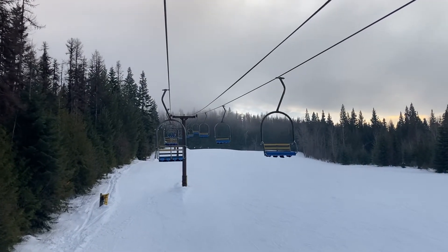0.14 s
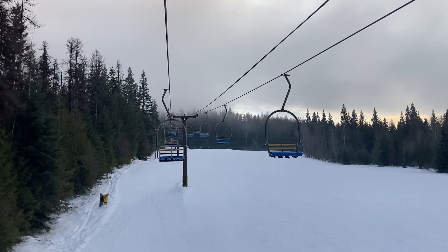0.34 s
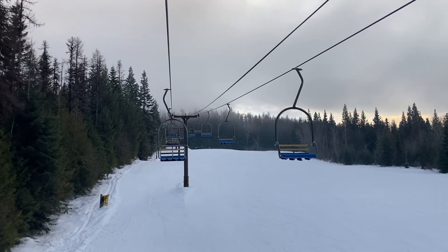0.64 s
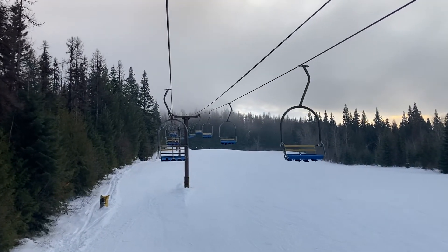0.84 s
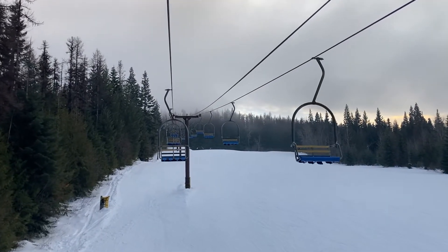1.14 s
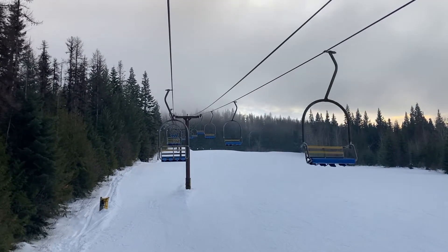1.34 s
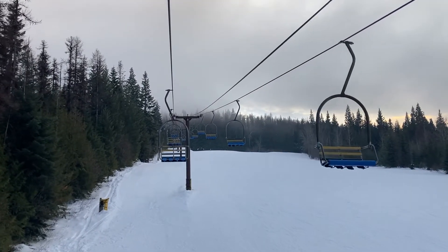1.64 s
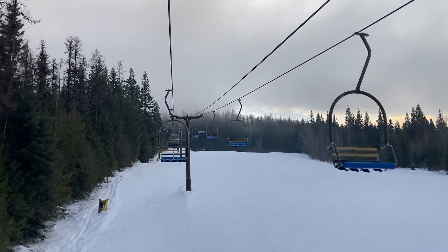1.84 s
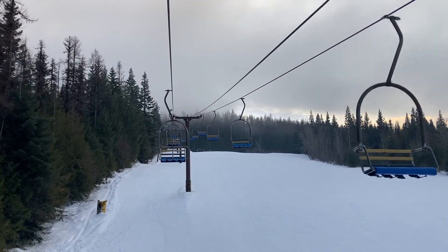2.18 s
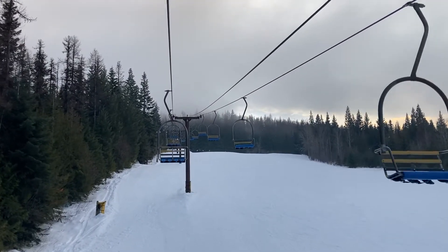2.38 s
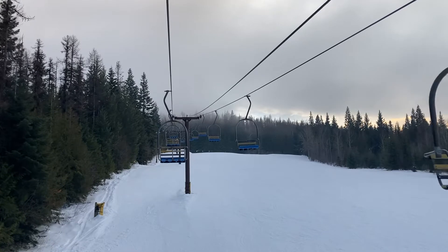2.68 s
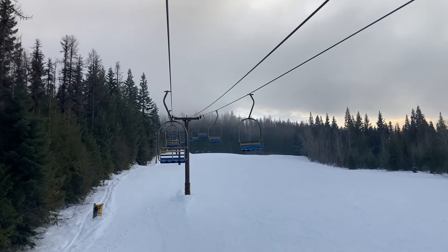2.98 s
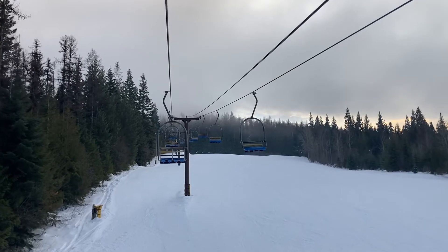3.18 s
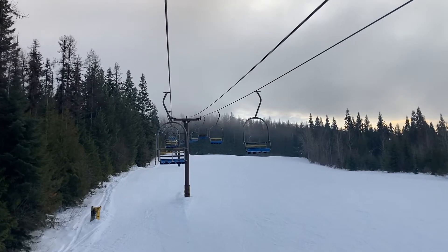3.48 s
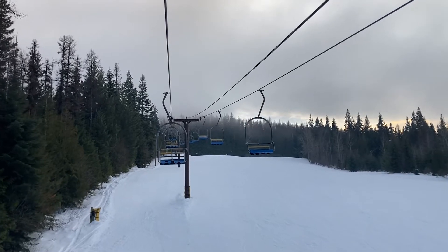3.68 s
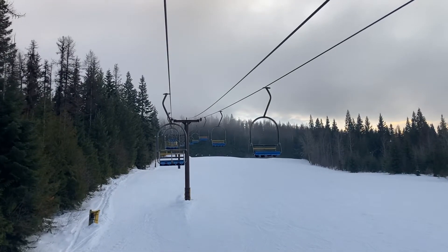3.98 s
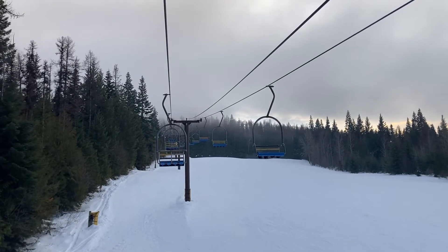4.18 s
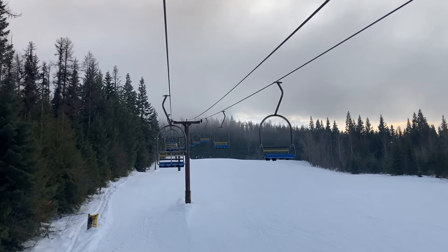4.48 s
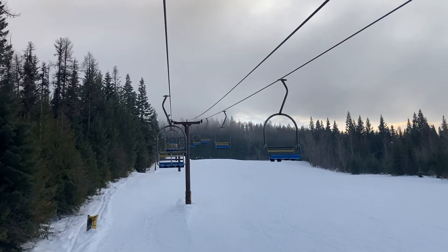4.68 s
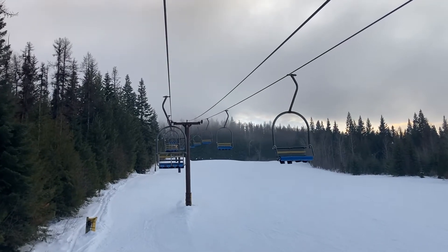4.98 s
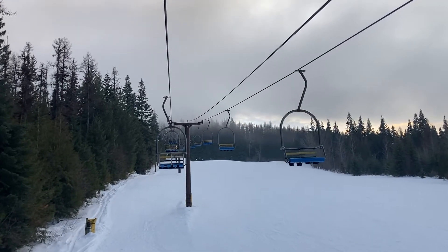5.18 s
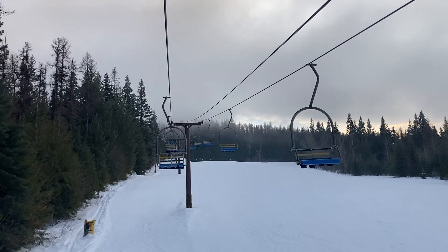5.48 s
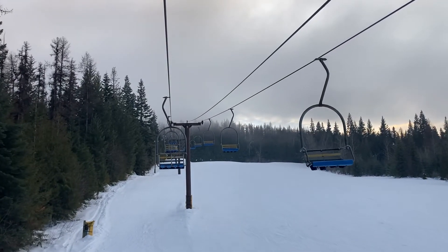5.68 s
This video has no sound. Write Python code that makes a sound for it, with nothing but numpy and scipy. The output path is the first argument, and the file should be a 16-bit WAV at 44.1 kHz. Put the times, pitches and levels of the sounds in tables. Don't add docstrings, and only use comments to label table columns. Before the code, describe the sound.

Close stereo handheld sound from a chair over a snowy slope. Faint rumble and a humming hanger lie beneath bassy wind bumps. A steel fitting clacks irregularly in front, rattles more quickly, then clangs with short high rings while drifting right. Ticks become drier and more separate, more wind thumps arrive, and gritty metal scraping closes the passage from near the centre.

```python
import sys
import numpy as np
from scipy import signal
from scipy.fft import rfft, irfft
from scipy.io import wavfile
from scipy.ndimage import uniform_filter1d, map_coordinates

SR = 44100
rng = np.random.default_rng(int(sys.argv[2]) if len(sys.argv) > 2 else 0)


def voltage_ratio(level):
    return 10 ** (np.asarray(level, float) / 20)


def generate_wav(signal):
    frames = np.transpose(np.atleast_2d(signal))
    scaled = np.clip(frames, -1, 1) * 32767
    pcm = np.round(scaled).astype(np.int16)
    wavfile.write(sys.argv[1], SR, pcm)


N = 257089
T = np.arange(N) / SR

# time in seconds, level in dB.
GUST = [(0, -51), (0.2, -62), (0.3, -59.5), (0.65, -62.5), (0.78, -62), (1.04, -57.5), (1.15, -66),
        (1.55, -65.5), (1.7, -58.5), (2.5, -63.5), (2.9, -56.5), (3.15, -45.5), (3.39, -52), (3.43, -78),
        (3.6, -67), (4.12, -65.5), (4.3, -60), (5.83, -63)]
# time in seconds, peak in dB, length in seconds,
# upper edge in dB over the thud.
BUFFETS = [(0.076, -46.5, 0.027, -11.5), (0.19, -48, 0.04, -10), (0.4, -54.5, 0.012, -13),
           (0.537, -53.5, .02, -6), (0.736, -59, 0.024, 3), (0.868, -49.5, 0.021, -8),
           (1.098, -53, .02, -10), (1.321, -69, 0.018, -11), (1.477, -67, .02, -4),
           (1.621, -54.5, 0.023, -6.5), (1.898, -56, 0.049, -4), (2.087, -57, 0.045, -20),
           (2.205, -52.5, 0.027, -15), (2.318, -60, .02, -17), (2.575, -57, 0.014, -13),
           (2.699, -46.5, 0.011, -17), (2.784, -44, 0.021, -14.5), (2.945, -40, 0.008, -4.5),
           (3.026, -34.5, 0.0093, -21), (3.146, -30.5, 0.0074, -17), (3.316, -37.5, 0.025, -10.5),
           (3.353, -42, 0.012, -1), (3.377, -35, 0.015, -14), (3.547, -60, .015, -17),
           (3.615, -55, 0.017, -6), (3.798, -56.5, 0.0085, -7), (4.047, -62.5, 0.015, -3),
           (4.202, -55, 0.038, -6), (4.458, -52, 0.053, -37), (4.621, -43.5, 0.026, -17.5),
           (4.746, -59.5, 0.11, -19), (4.897, -62, 0.023, -15), (5.032, -56, 0.021, -21),
           (5.24, -47.5, 0.019, -28), (5.435, -42, 0.017, -7.5), (5.615, -48.5, 0.0095, -23),
           (5.665, -51, 0.043, -14), (5.721, -41.5, 0.014, -7)]
# frequency in Hz, density in dB per Hz.
RUMBLE = [(35, -45), (60, 10.5), (86, -5), (276, -11.5), (443, -20.5), (870, -28.5), (2340, -33.5),
          (3060, -52), (3420, -39), (5490, -59), (7520, -46.5), (8300, -47.5), (9800, -53), (10800, -50.5),
          (12900, -56.5), (13400, -72), (16800, -105), (22000, -120)]
# frequency in Hz, width in Hz, level in dB.
HANGER = [(198, 26, 4), (228, 58, -3), (290.4, 78, 7.5)]
# time in seconds, level in dB, fade in seconds.
JOLTS = [
    (0.0, -59.5, 0.32),
    (0.308, -58, 0.31),
    (1.25, -54.5, 0.12),
    (1.62, -60.5, 0.98),
    (2.05, -56.5, 0.58),
    (2.15, -53, 0.081),
    (5.57, -57, 0.026),
    (5.711, -38, 0.011),
]
# time in seconds, chatter level in dB.
SHAKE = [(0, -80.5), (0.26, -79.5), (0.44, -75), (0.7, -77), (1.3, -79.5), (1.59, -73.5), (2.25, -67.5),
         (2.63, -77.5), (2.82, -79), (3.09, -84), (3.49, -72), (3.65, -83), (4.38, -70), (4.61, -95),
         (4.77, -73), (5.3, -90.5), (5.57, -72.5), (5.8, -66)]
# time in seconds, lag of the left port in ms, left minus right in dB.
BEARING = [
    (0, -0.019, -0.5),
    (1.2, 0.067, 1.5),
    (1.74, 0.066, 0),
    (2, 0.07, -0.5),
    (3, 0.2, 4),
    (3.6, 0.32, -11),
    (4.2, 0.41, -3),
    (5.345, 0.4, -3.5),
    (5.35, -0.078, 1),
    (5.83, -0.07, -5.5),
]
# frequency in Hz, level in dB, t60 in seconds.
FRAME = [(1340, -4, .07), (1520, -2, .06), (1735, 2, .08), (2035, 2, .08), (2140, 0, .07), (2310, 0, .06),
         (2520, 2, .07), (2750, 2, .07), (3085, 2, .06), (3950, 0, .08), (4180, -2, .07), (4510, 0, .09),
         (4750, -4, .08)]
# frequency in Hz, level in dB, t60 in seconds.
TUBE = [(3338, -3, .45), (3408, -3, .3), (3430, -4, .3), (3473, -6, .3), (3528, 0, .36), (3570, -8, .25),
        (3622, -4, .3), (3668, -7, .2), (3730, -9, .1)]
# frequency in Hz, level in dB, t60 in seconds.
OVERTONES = [(6115, -2, .13), (6595, 0, .12), (6804, -3, .12), (7215, 2, .09)]
# frequency in Hz, width in Hz, level in dB.
SINGING = [(3460, 45, 0), (3630, 50, -3)]
# frequency in Hz, density in dB per Hz.
CRACK = [(710, -36), (1200, 1), (1770, -0.5), (2260, -3), (3070, -8), (3750, -17.5), (4880, -30),
         (8250, -120)]
# frequency in Hz, density in dB per Hz.
UPPER = [(2210, -21), (3750, -9), (4370, -10), (4730, -11.5), (5600, -15.5), (7280, -44), (12300, -120)]
# frequency in Hz, density in dB per Hz.
TREBLE = [(3240, -4.5), (4900, -15.5), (5450, -33), (5970, -2.5), (7530, -0.5), (8170, -1.5), (9030, 3.5),
          (9800, -5), (10300, -7), (10900, -0.5), (12100, -8), (12900, -13), (13400, -23), (15600, -37),
          (16500, -47), (22000, -120)]
# frequency in Hz, density in dB per Hz.
BODY = [(250, -27.5), (430, -2), (825, 0), (987, -3), (1050, 2.5), (1250, -42), (1620, -31), (2750, -120)]
# time in seconds, favoured ring in Hz, spread in Hz.
SLIDE = [
    (0, 3520, 70),
    (2.9, 3520, 70),
    (3.0, 3550, 10),
    (3.3, 3510, 10),
    (3.55, 3430, 10),
    (4.0, 3420, 10),
    (4.2, 3335, 5),
    (4.5, 3400, 60),
    (5.83, 3500, 60),
]
# time in seconds, peak in dB,
# contact spot in Hz, tube ring in dB, hardness as treble in dB.
LOOSE = [(0.0005, -57, 1870, -18, -32), (0.1605, -57, 2600, 3, -32), (0.2795, -60.5, 2970, -1, -28),
         (0.3095, -52.5, 3190, -22, -31), (0.3301, -48, 2040, -34, -27.5),
         (0.354, -48.5, 1620, -4.5, -20.5), (0.4264, -61, 1510, -3, -32), (0.4753, -58, 2070, -37, -28),
         (0.4998, -51.5, 2210, -9, -25), (0.5472, -50, 2180, 3.5, -27), (0.656, -66.5, 4960, -22, -21),
         (0.7627, -65, 2020, 3, -30), (0.9542, -59, 2225, 0, -30), (1.074, -55.5, 2520, -6, -47),
         (1.269, -57, 1650, -5, -56), (1.2955, -47.5, 2290, -13, -57), (1.3434, -52, 1970, 0, -23),
         (1.4508, -68, 2270, -20, -33), (1.508, -56, 2260, -21, -22.5), (1.5668, -72, 1516, 9, -19),
         (1.586, -60, 1600, 1, -21)]
RATTLE = [(1.6207, -51, 2330, 4, -17), (1.6687, -45.5, 2100, 5, -12.5), (1.719, -48, 1750, -12, -15),
          (1.7385, -42.5, 1550, -5, -14.5), (1.8127, -46.5, 1920, -7, -14.5),
          (1.8582, -56.5, 1860, -21, -16), (1.9599, -45.5, 1970, -1, -16.5), (2.0084, -47, 1830, 1, -15),
          (2.0604, -44.5, 1950, -14, -18), (2.1092, -49, 1500, 4.5, -20.5), (2.14, -58, 1570, 4, -18),
          (2.158, -41, 1940, -5.5, -19), (2.2149, -83.5, 1960, -14, -34), (2.2686, -47, 1930, -0.5, -26.5),
          (2.3533, -44, 1960, -9, -24.5), (2.4154, -47.5, 1980, 5.5, -24), (2.4669, -45.5, 2000, 8, -30),
          (2.538, -49, 2220, -10, -27), (2.588, -48, 2160, -36, -43), (2.6213, -43.5, 1950, 4.5, -29),
          (2.7276, -50, 2520, 10, -24.5), (2.7776, -47, 2360, -4.5, -33.5), (2.8394, -58.5, 2580, -19, -59)]
CLANG = [(2.9713, -44.5, 3440, -7.5, -66), (3.059, -40.5, 4560, 0, -23), (3.0759, -34, 3536, -9, -31),
         (3.249, -43.5, 4720, -17, -22), (3.2665, -31.5, 3890, -8, -28), (3.4482, -41.5, 3490, 2, -36.5),
         (3.5434, -36.5, 3400, -3, -24.5), (3.6446, -51.5, 2120, -4.5, -51), (3.7823, -64, 2450, -28, -55),
         (3.797, -75, 2420, -25, -50), (3.8104, -61.5, 2630, -24, -58), (3.826, -71, 2450, -25, -50),
         (3.8438, -61.5, 2350, -6, -40), (3.862, -65, 2420, -15, -45), (3.884, -60, 2370, -2, -42),
         (3.902, -71, 2370, -20, -45), (3.9716, -53, 1660, 3, -33), (3.9997, -43.5, 2790, 5, -39),
         (4.0442, -46, 2740, -3, -38)]
TICK = [(4.2006, -46.5, 2330, 7, -28.5), (4.306, -50, 1910, 2, -34), (4.3319, -48, 1900, -26, -32),
        (4.3588, -49, 2280, -9, -29.5), (4.3904, -50, 1860, -36, -42), (4.5606, -45.5, 2420, -7, -33.5),
        (4.601, -51, 2330, -43, -40), (4.628, -43.5, 2270, -37, -36), (4.6518, -44, 2420, -5.5, -35.5),
        (4.7601, -43, 2520, -9, -37.5), (4.8317, -42.5, 2340, -39, -47), (4.853, -36, 2580, -46, -49.5),
        (4.9606, -40.5, 2580, -34, -41.5), (5.1614, -58.5, 2500, -38, -44), (5.329, -48.5, 2670, 1, -39)]
# time in seconds, peak in dB, body in dB, tube ring in dB,
# fade in seconds.
CRUNCHES = [(5.3612, -51.5, -5, -13, 0.026), (5.3722, -43.5, -1.5, -3, 0.017),
            (5.3977, -48, -2, -0.5, 0.023), (5.42, -52.5, -16, -4, 0.029), (5.453, -55.5, -0.5, 0.5, 0.042),
            (5.5644, -55.5, -24, 0, 0.01), (5.66, -53, -3, -10, 0.012), (5.6715, -44, -0.5, 0.5, 0.016),
            (5.685, -56, -20, -1, 0.03), (5.6994, -49, -5, 1.5, 0.022), (5.725, -50.5, -8, -1, 0.034),
            (5.7527, -35.5, -10, -9, 0.0093), (5.775, -53, -3, -10, 0.02), (5.795, -46, -4.5, -2.5, 0.025)]


def level(x, db=0):
    return x * voltage_ratio(db) / np.sqrt(np.mean(x ** 2))


def shape(points, hz):
    f, db = np.transpose(points)
    return np.interp(np.log(hz + 1), np.log(f), db)


def noise(db_at, size=N):
    hz = np.fft.rfftfreq(size, 1 / SR)
    return level(irfft(rfft(rng.standard_normal(size)) * voltage_ratio(db_at(hz)), size))


def colour(points, size=N):
    return noise(lambda hz: shape(points, hz), size)


def bell(centre_hz, fall_db):
    return noise(lambda hz: -fall_db * np.log2((hz + 1) / centre_hz) ** 2)


def resonance(centre_hz, width_hz, order=4):
    return noise(lambda hz: -10 * np.log10(1 + np.abs(2 * (hz - centre_hz) / width_hz) ** order))


def banded(x, depth_db, width_hz):
    hz = np.fft.rfftfreq(x.shape[-1], 1 / SR)
    knots = np.arange(0, SR / 2 + 1000, width_hz)
    bumps = np.clip(rng.standard_normal(len(knots)), -2, 1.3)
    gain = voltage_ratio(depth_db * np.interp(hz, knots, bumps))
    return level(irfft(rfft(x) * gain, x.shape[-1])) * np.std(x)


def walk(rate_hz):
    k = int(SR / rate_hz)
    held = np.repeat(rng.standard_normal(N // k + 1), k)
    w = uniform_filter1d(uniform_filter1d(held, k), k)[:N]
    return level(w - w.mean())


def curves(table, at_s=T):
    s, *columns = np.transpose(table)
    return [np.interp(at_s, s, c) for c in columns]


def ring(modes, db, t, stray):
    hz, mode_db, t60 = np.transpose(modes)[:, :, None]
    luck = rng.standard_normal((2, len(modes), 1))
    gain = voltage_ratio(mode_db + db + 3.0 * luck[0]) * np.sign(luck[1])
    decay = np.exp(-np.log(1000) * t / t60)
    return np.sum(gain * decay * np.sin(2 * np.pi * hz * (1 + stray * luck[1]) * t), axis=0)


def place(x, lag_ms, pan_db, apart):
    at = np.arange(x.shape[-1]) - lag_ms * SR / 1000
    late = map_coordinates(x, [at], order=3)
    return np.array([late * voltage_ratio(pan_db / 2) + apart[0], x * voltage_ratio(-pan_db / 2) + apart[1]])


def turned():
    turn_s, takes_s = 4.14, 0.1
    return (1 + np.tanh((T - turn_s) / takes_s)) / 2


def gusts():
    roll_hz, stray = 64.9, 0.072
    gust_db, = curves(GUST)
    slaps, edge = 0, voltage_ratio(-68)
    for (s, db, length_s, edge_db), luck in zip(BUFFETS, rng.standard_normal((len(BUFFETS), 2))):
        push = voltage_ratio(db) * np.exp(-((T - s) / length_s) ** 2)
        turns = roll_hz * (1 + stray * luck[0]) * (T - s)
        slaps = slaps + push * np.exp(2j * np.pi * (turns + luck[1]))
        edge = np.hypot(edge, voltage_ratio(edge_db) * push)
    return voltage_ratio(gust_db), slaps, edge


def wind():
    thud, slaps, sharp = gusts()
    side_on = turned()
    front_rad, side_rad = 0.48, 2.16
    phase = front_rad + (side_rad - front_rad) * side_on
    rate_hz = 64 * voltage_ratio(np.clip(2.2 * walk(22), -3.5, 3.5))
    eddy = np.exp(2j * np.pi * np.cumsum(rate_hz) / SR) * voltage_ratio(4.2 * walk(16))
    blur = .95 * signal.hilbert(bell(52, 11))
    edge = signal.hilbert(bell(122, 18)) * voltage_ratio(2.54 * walk(15))
    big = thud * (level(eddy.real) + 1j * level(eddy.imag) + blur) + voltage_ratio(0.5) * slaps
    small = voltage_ratio(-side_on - 3.5) * sharp * edge

    def at_ports(gust, apart_rad):
        return (gust * np.exp(.5j * np.array([apart_rad, -apart_rad]))).real / np.cos(apart_rad / 2)

    own = np.array([bell(80, 9) for _ in range(2)])
    return voltage_ratio(3.0) * (at_ports(big, phase) + at_ports(small, 0.95 * phase) + 0.22 * thud * own)


def rumble():
    out, swell = 0, walk(0.56)
    for centre_hz in 130 * 2 ** np.arange(0, 7, .5):
        band = lambda hz: shape(RUMBLE, hz) - 24 * np.log2((hz + 1) / centre_hz) ** 2 / .5
        weight = np.sqrt(np.mean(voltage_ratio(band(np.fft.rfftfreq(8192, 1 / SR))) ** 2))
        apart = np.clip(0.1 * (centre_hz / 250) ** 4.5, .2, 1)
        mid, side = noise(band), apart * noise(band)
        flicker_db = 2.2 * min(1, 1500 / centre_hz) * walk(9)
        dip_db = 0.84 * (170 < centre_hz < 1700)
        ports = np.array([mid + side, np.roll(mid, -8) - side])
        out = out + weight * voltage_ratio(0.058 * swell + flicker_db - dip_db) * ports
    return level(out, -62.5)


def hum_db():
    rise_s = .015
    power = voltage_ratio(-69.5) ** 2
    for s, db, fade_s in JOLTS:
        since = np.clip(T - s + rise_s, 0, None)
        power = power + (voltage_ratio(db) * np.minimum(since / rise_s, 1) * np.exp(-since / fade_s)) ** 2
    return 10 * np.log10(power)


def drone():
    hum = level(sum(voltage_ratio(db + 2.0 * walk(6.3)) * resonance(hz, width_hz, 3) for hz, width_hz, db in HANGER))
    apart = 0.24 * np.array([bell(250, 30) for _ in range(2)])
    return voltage_ratio(hum_db() - 1.5) * (np.array([hum, np.roll(hum, -10)]) + apart)


def chatter():
    mid_db, = curves(SHAKE)
    over_calm_db = mid_db + 72
    treble_db = -91.5 + 2.5 * over_calm_db
    jolt_db = np.minimum(hum_db() + 69.5, 10)
    body_db = -73 + 8 * turned() + 0.03 * over_calm_db + jolt_db
    slips_per_s, grain_s = 400, 0.0049
    slips = (rng.random(N) < slips_per_s / SR) * voltage_ratio(np.minimum(3.5 * rng.exponential(size=N), 7))
    grains = level(0.5 + signal.lfilter([1], [1, -np.exp(-1 / (grain_s * SR))], slips))
    rattle = level(sum(voltage_ratio(db + 3.5 * walk(30)) * resonance(hz, 160) for hz, db, _ in FRAME[:9] + TUBE[1::2]))

    def layers():
        swirl = level(sum(voltage_ratio(3.0 * walk(8)) * banded(colour(BODY), 4, 90) for _ in range(3)))
        mid = voltage_ratio(mid_db + 1.5) * (colour(CRACK) + 0.16 * colour(UPPER))
        return grains * (mid + voltage_ratio(treble_db - 1.0) * colour(TREBLE)) + voltage_ratio(body_db - 6.5) * swirl

    shared = layers() + voltage_ratio(mid_db - 2.5) * rattle
    return place(shared, curves(BEARING)[0], -1.5, .45 * np.array([layers(), layers()]))


def singing():
    shake_db, = curves(SHAKE)
    tone = sum(voltage_ratio(db + 2.5 * walk(14)) * resonance(hz, width_hz) for hz, width_hz, db in SINGING)
    touching = (1 - np.tanh((T - 3.0) / 0.1)) / 2
    strength = voltage_ratio(-76.5 + 1.9 * (shake_db + 72))
    return place(tone * touching * strength, curves(BEARING)[0], 0, (0, 0))


def strike(out, s, db, blow, scatter):
    lag_ms, pan_db = curves(BEARING, s)
    at = int(s * SR)
    out[:, at:at + len(blow)] += voltage_ratio(db) * place(blow, lag_ms, pan_db, scatter)


def contact_ping(t, spot_hz):
    ping_s, rebound_s, rebound_db = .0014, .0045, -15
    late = np.clip(t - rebound_s, 0, None) / ping_s
    envelope = np.exp(-t / ping_s) - voltage_ratio(rebound_db) * late * np.exp(1 - late)
    return np.sin(2 * np.pi * spot_hz * t) * envelope


def tube_ring(t, s, db):
    ring_hz, spread_hz = curves(SLIDE, s)
    struck_hz = ring_hz + spread_hz * rng.standard_normal()
    mode_db = db - 6.5 * np.abs(np.array(TUBE)[:, :1] - struck_hz) / 100
    square = spread_hz < 30
    return ring(TUBE, mode_db - 14.0, t, stray=.0012 if square else .011)


def clack(out, row, upper_db, tail_db, ping_db, size=16384):
    s, db, spot_hz, tube_db, treble_db = row
    t = np.arange(size) / SR
    rise = 1 - np.exp(-t / 0.0017)
    knock_db = -1.5 - 26.5 * max(np.log2(spot_hz / 1500), 0)

    def spot(hz):
        peak_db = 9 * np.exp(-(np.log2((hz + 1) / spot_hz) / 0.42) ** 2)
        low_cut_db = 22 * np.clip(np.log2(0.5 * spot_hz / (hz + 1)), 0, 3)
        return shape(CRACK, hz) + peak_db - low_cut_db

    grit = np.array([noise(spot, size) + voltage_ratio(upper_db + 5.5) * colour(UPPER, size)
                     + voltage_ratio(treble_db + 17.5) * colour(TREBLE, size)
                     + voltage_ratio(knock_db) * colour(BODY, size) for _ in range(3)])
    crack, *scatter = banded(grit, 4.8, 324.7)
    bounce = t - .003 - 0.0042 * rng.random()
    fade = .3 * np.exp(-t / .011) + .07 * np.exp(-t / .03)
    fade = voltage_ratio(tail_db) * (fade + 0.15 * np.exp(-np.abs(bounce) / 0.017) * (bounce > 0))
    dull = signal.lfilter(*signal.butter(1, 3700, fs=SR), crack)
    snap = voltage_ratio(treble_db + 6.5) * banded(colour(TREBLE, size), 0.85, 550) * np.exp(-t / 0.00057)
    ping = voltage_ratio(ping_db + 4) * contact_ping(t, spot_hz)
    frame_hz = np.array(FRAME)[:, :1]
    frame_db = np.where(frame_hz > 3750, upper_db + 0.5, spot(frame_hz) - spot(frame_hz).max())
    overtones = ring(OVERTONES, treble_db + 3, t, stray=0.002)
    frame = ring(FRAME, frame_db + tail_db - 9.0, t, stray=0.0083)
    blow = rise * (0.69 * (crack * np.exp(-t / 0.0028) + dull * fade) + ping + snap + overtones + frame)
    if spot_hz > 2450:
        high_pass = signal.butter(2, spot_hz / 3.5, "high", fs=SR)
        blow, scatter = (signal.lfilter(*high_pass, x) for x in (blow, scatter))
    scatter = uniform_filter1d(np.array(scatter), size=4) * np.exp(-t / 0.024) * (1 - np.exp(-t / 0.00021))
    strike(out, s, db, blow + rise * tube_ring(t, s, tube_db), voltage_ratio(tail_db - 12.0) * scatter)


def clacks(out, blows, crack_db, db_per_hardness_db, tail_db, ping_db):
    for row in blows:
        clack(out, row, crack_db + db_per_hardness_db * (row[4] + 25), tail_db, ping_db)


def crunches(out, size=16384):
    t = np.arange(size) / SR
    rise = (1 - np.exp(-t / 0.0036)) ** 2
    for s, db, body_db, tube_db, fade_s in CRUNCHES:
        grit = np.array([colour(CRACK, size) + voltage_ratio(-3.0) * colour(UPPER, size) + voltage_ratio(-4) * colour(TREBLE, size)
                         + voltage_ratio(body_db + 2.5) * colour(BODY, size) for _ in range(3)])
        grind, *scatter = banded(grit, 3.5, 260) * rise * np.exp(-t / fade_s)
        uneven = level(uniform_filter1d(rng.standard_normal(size), size=200))
        bite = voltage_ratio(5.5 * np.clip(uneven, -2.5, 1))
        blow = 0.42 * grind * bite + rise * ring(FRAME, -13.0, t, stray=0.0085)
        tube = rise * ring(TUBE, tube_db - 8.5, t, stray=0.0061)
        strike(out, s - .002, db, blow + tube, voltage_ratio(-4.5) * uniform_filter1d(np.array(scatter), size=4))


def scene():
    blows = np.zeros((2, N + SR))
    clacks(blows, LOOSE, crack_db=-5.5, db_per_hardness_db=0.45, tail_db=0.73, ping_db=-2)
    clacks(blows, RATTLE, crack_db=-10.5, db_per_hardness_db=0.17, tail_db=0.73, ping_db=-8)
    clacks(blows, CLANG, crack_db=-7, db_per_hardness_db=0.12, tail_db=-8, ping_db=0.93)
    clacks(blows, TICK, crack_db=-3.5, db_per_hardness_db=0.68, tail_db=-6, ping_db=5.1)
    crunches(blows)
    return wind() + rumble() + drone() + chatter() + singing() + blows[:, :N]


def low_pass(x):
    return signal.sosfilt(signal.butter(12, 16000, fs=SR, output="sos"), x)


def record(dry):
    x = signal.sosfilt(signal.butter(3, 36, "high", fs=SR, output="sos"), dry)
    empty_band = signal.butter(3, [8550, 9600], "band", fs=SR, output="sos")
    mix = x - .97 * signal.sosfiltfilt(empty_band, x)
    return low_pass(mix)


dry = scene()
out = record(dry)
generate_wav(out)
```